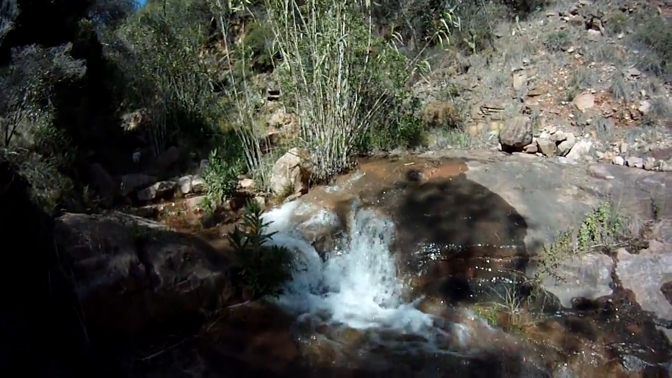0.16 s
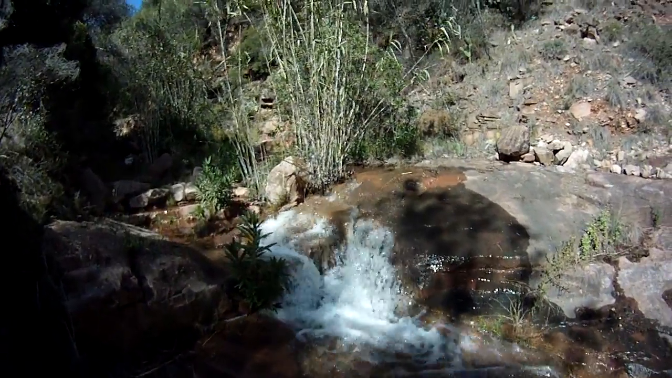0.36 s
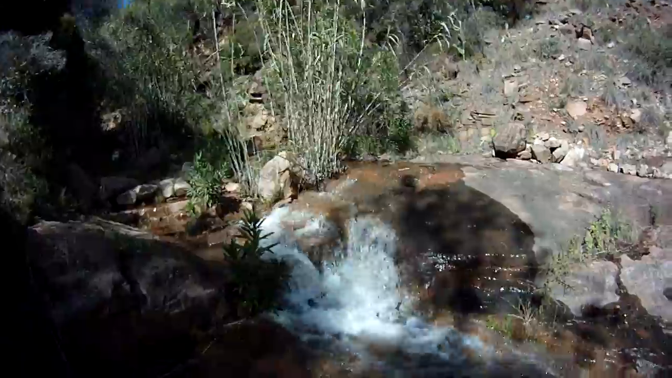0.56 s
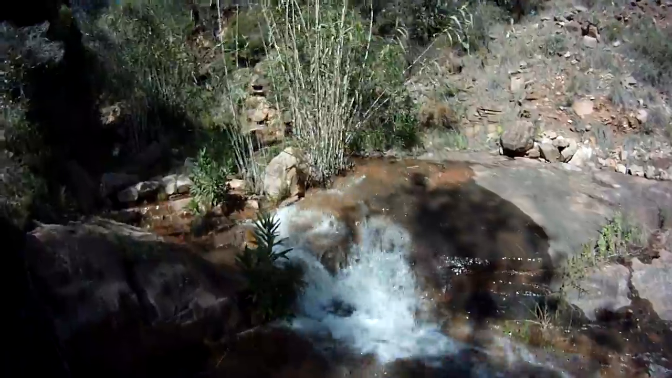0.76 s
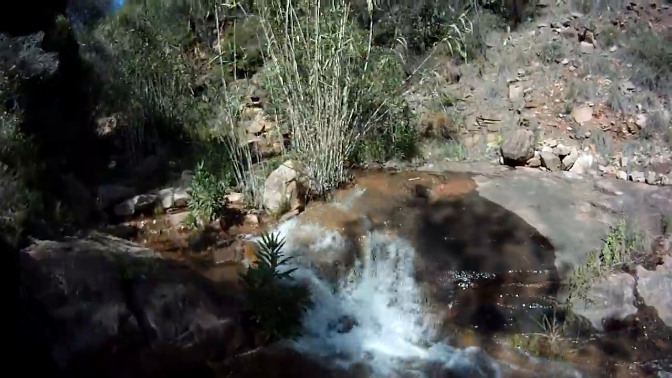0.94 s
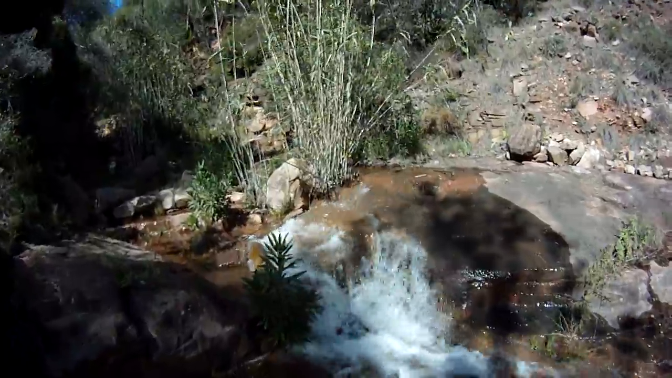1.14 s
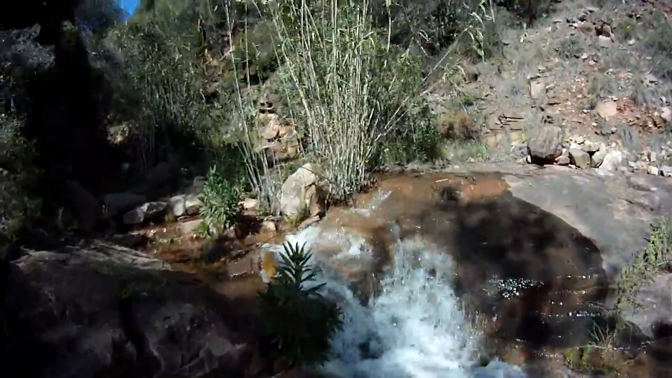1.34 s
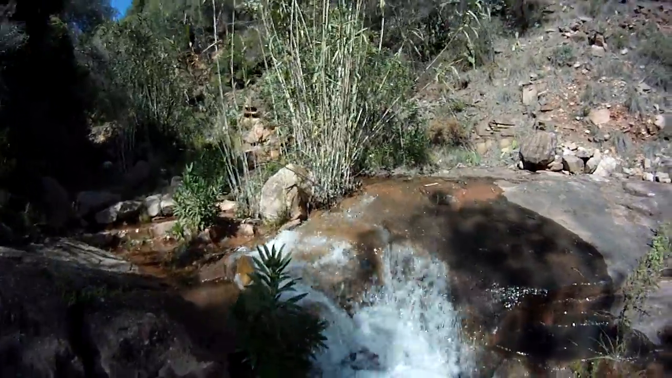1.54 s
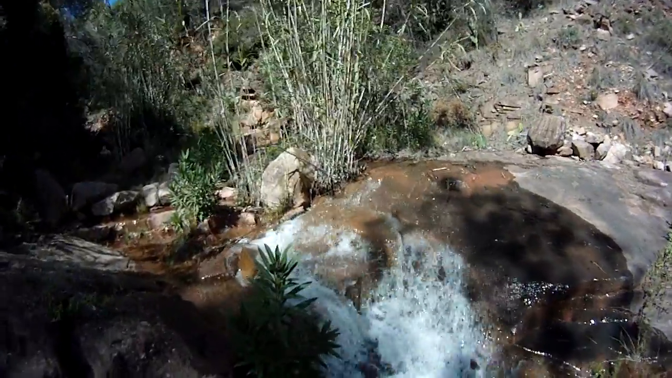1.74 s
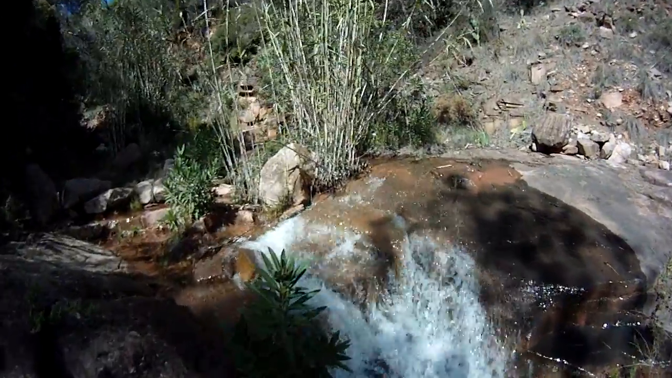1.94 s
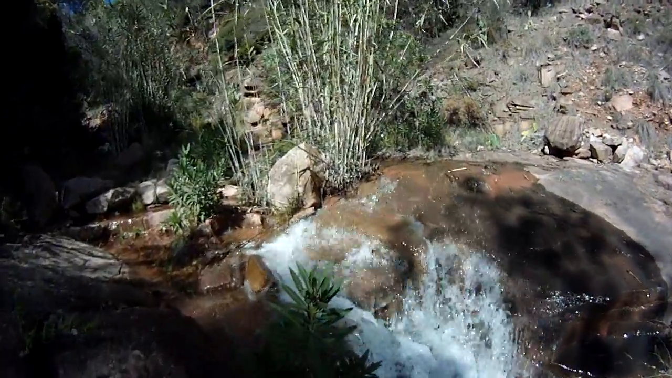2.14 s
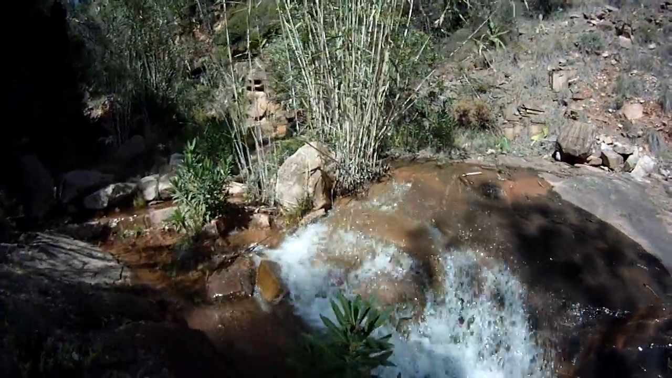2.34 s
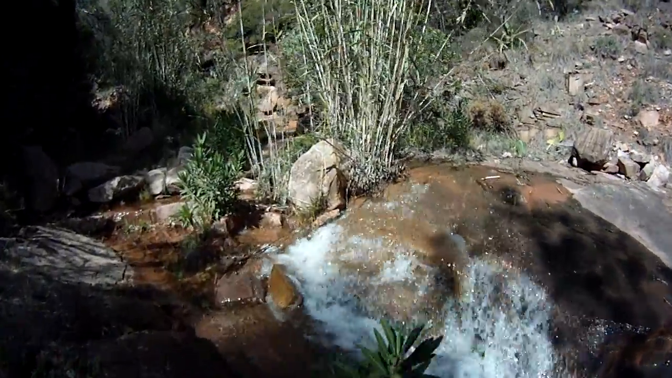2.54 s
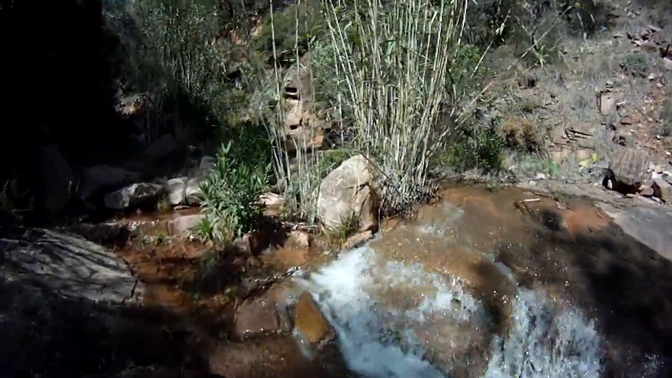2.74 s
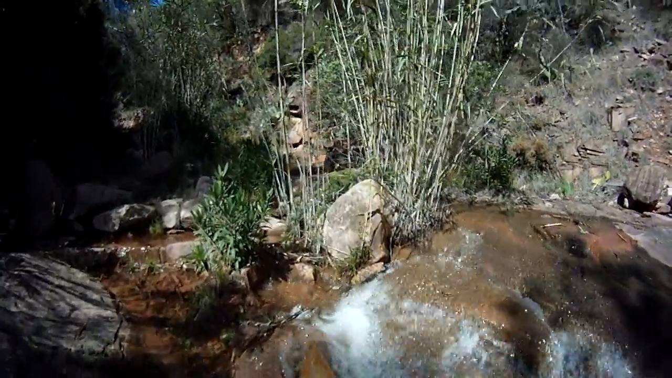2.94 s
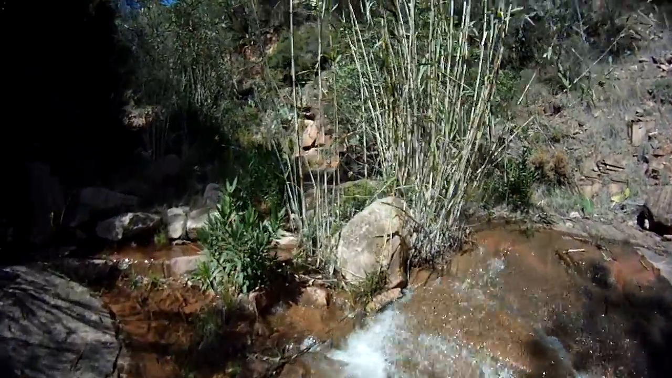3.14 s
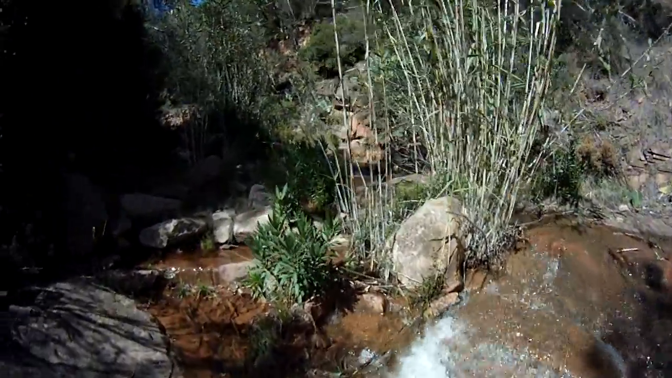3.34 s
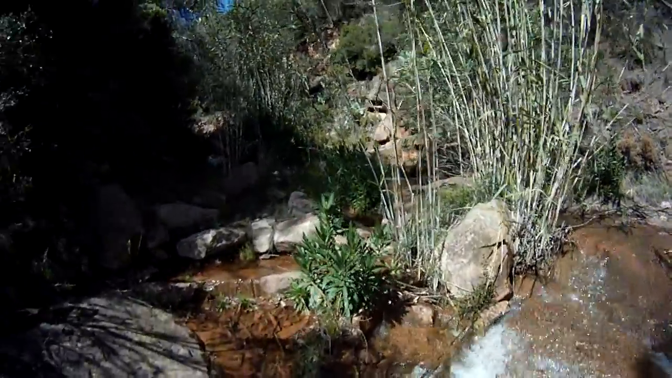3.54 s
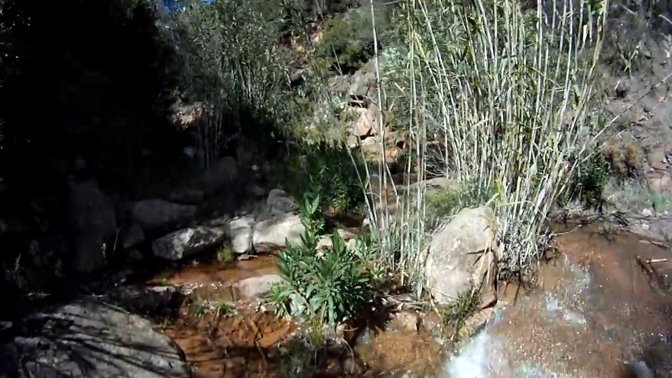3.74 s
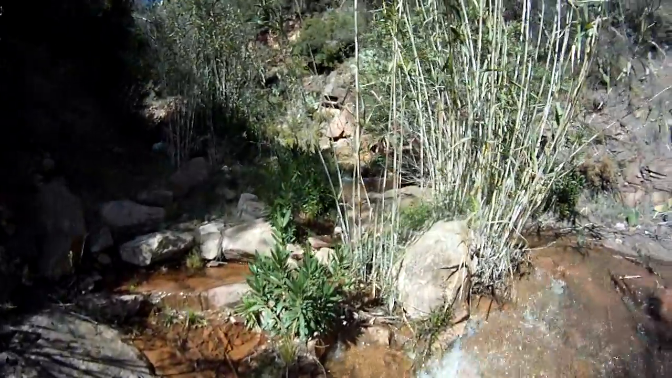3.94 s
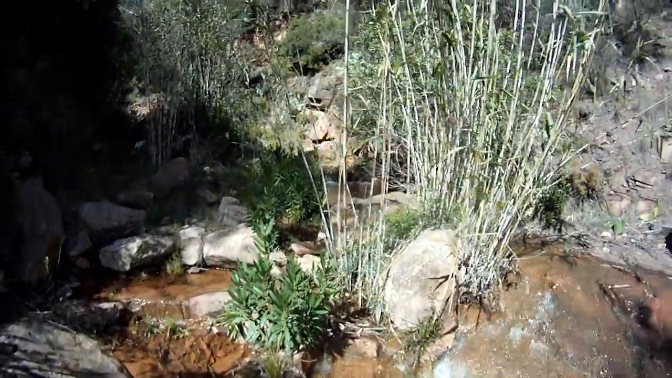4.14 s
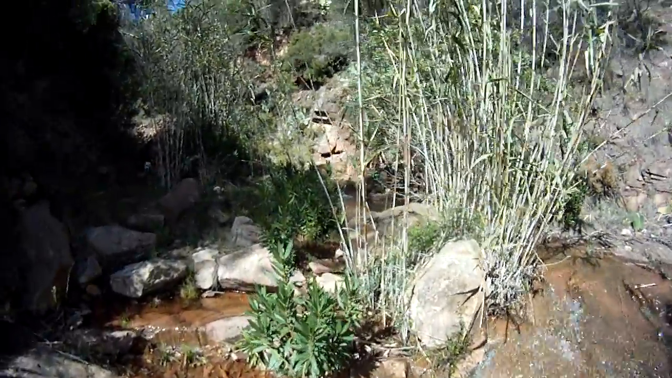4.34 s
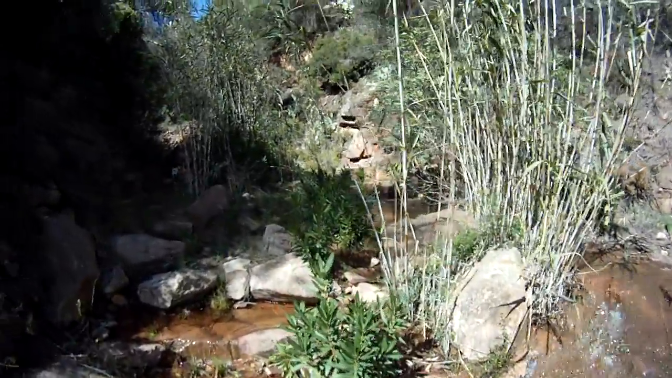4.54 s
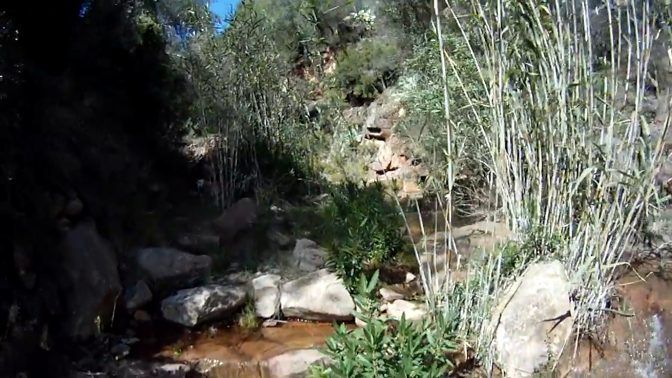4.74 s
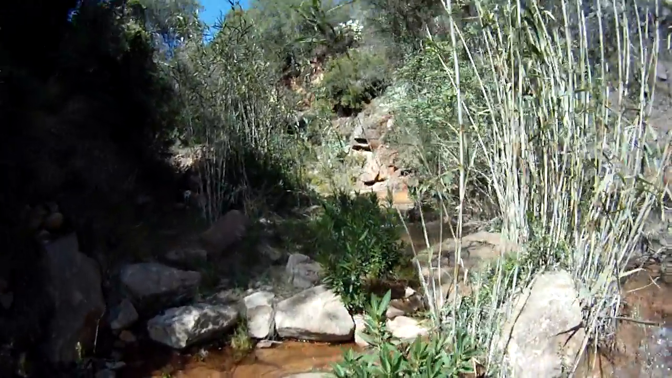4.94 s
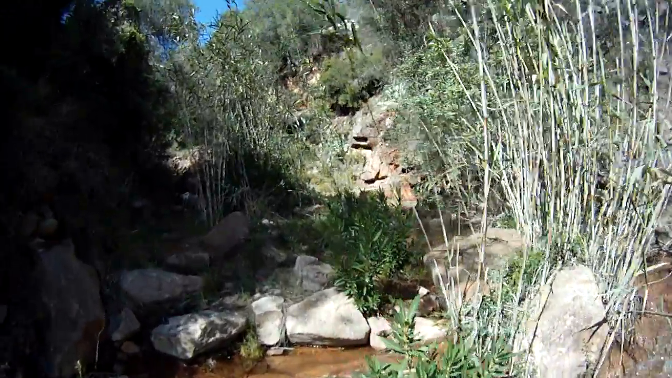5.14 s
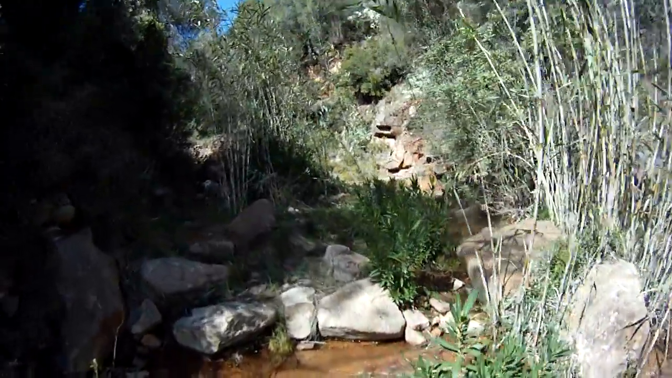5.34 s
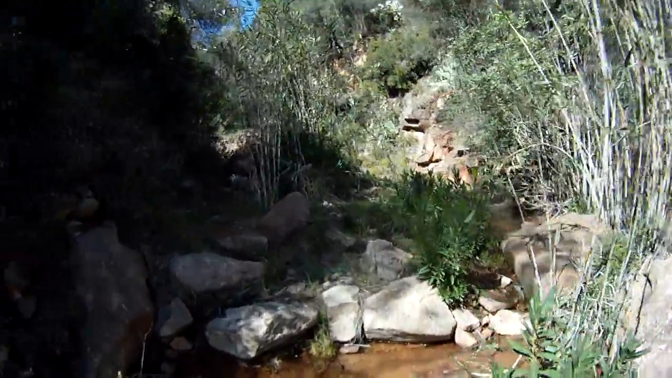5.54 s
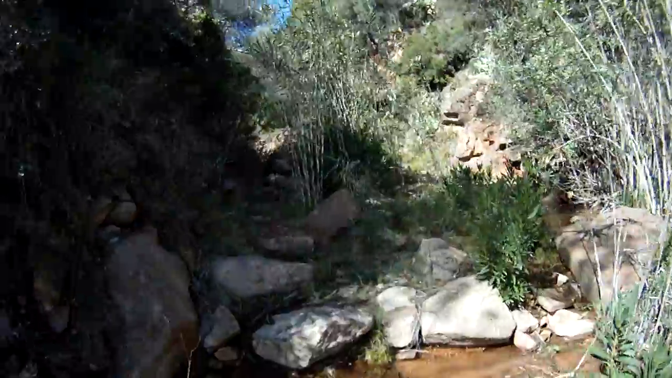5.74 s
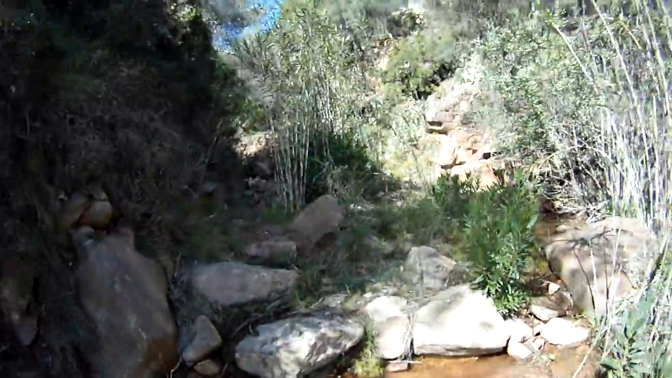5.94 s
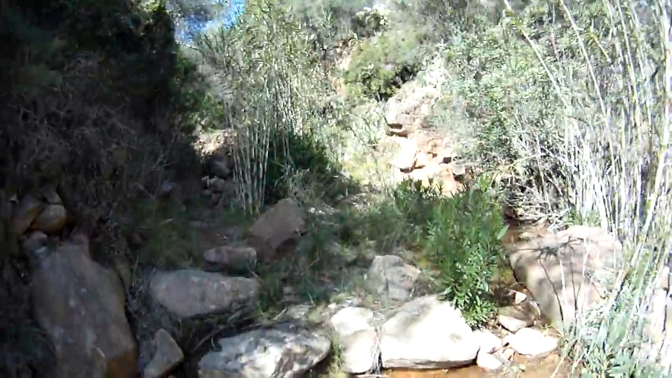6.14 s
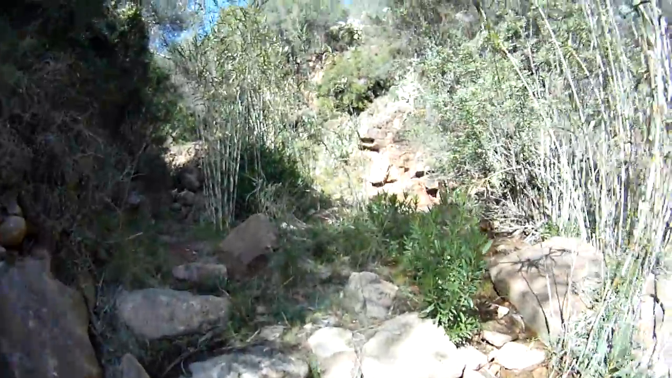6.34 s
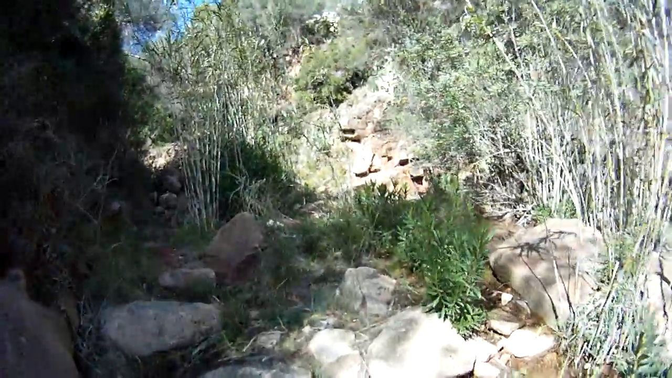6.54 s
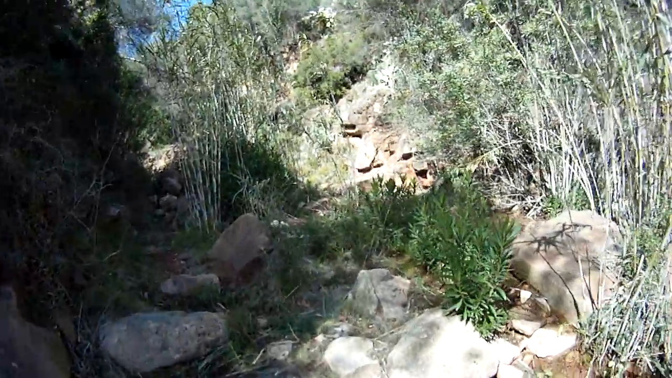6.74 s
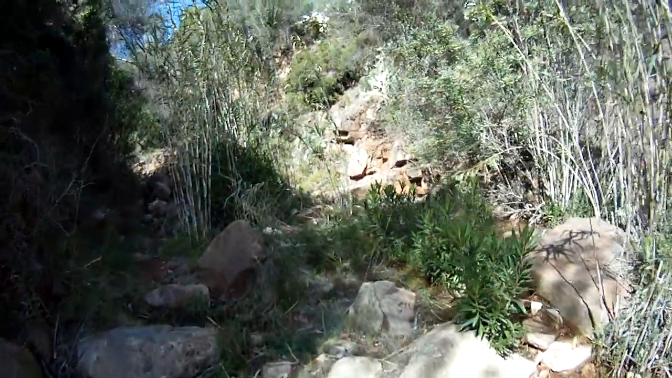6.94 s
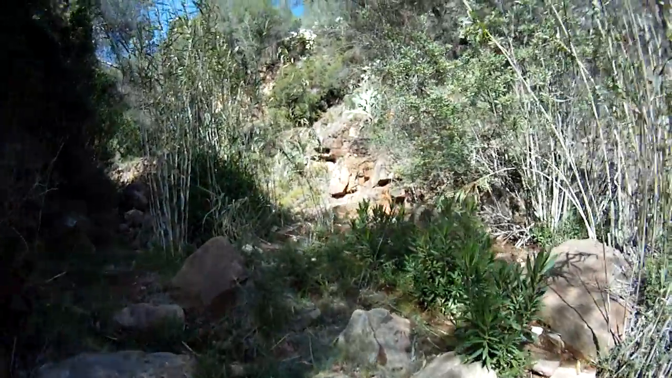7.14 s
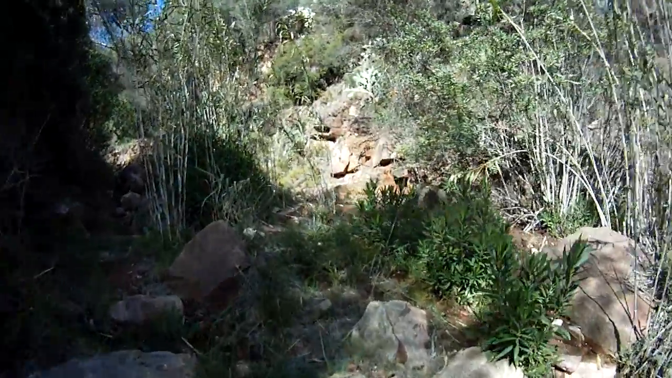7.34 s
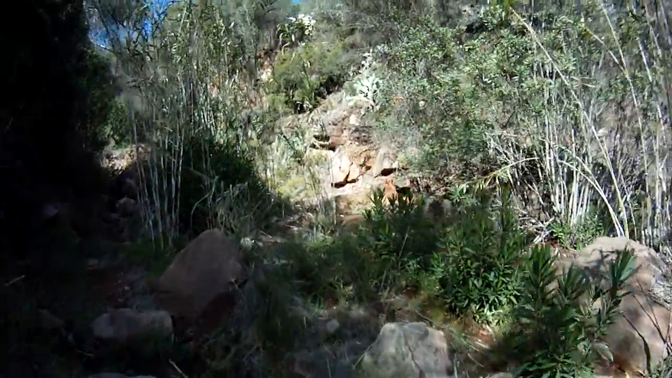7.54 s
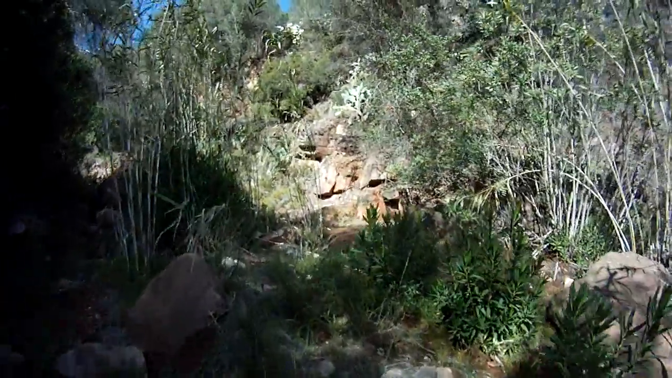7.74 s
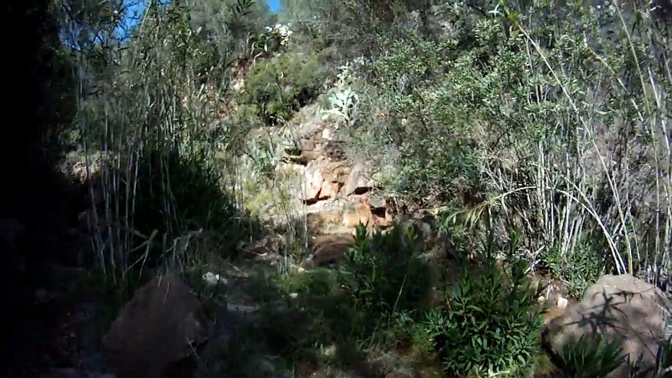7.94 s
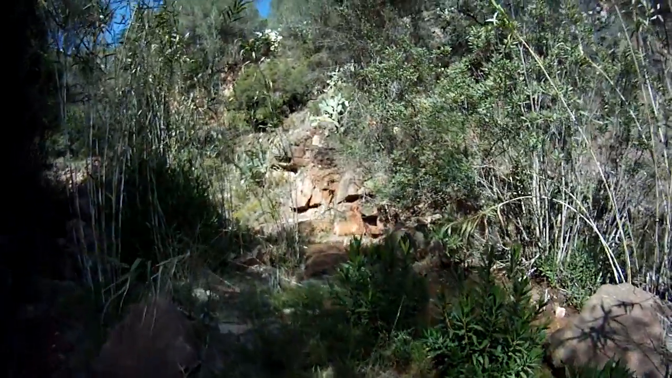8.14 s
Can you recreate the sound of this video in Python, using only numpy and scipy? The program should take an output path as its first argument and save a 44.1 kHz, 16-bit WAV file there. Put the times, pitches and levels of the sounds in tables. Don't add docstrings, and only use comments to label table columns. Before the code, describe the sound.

A small rocky cascade gurgles and booms close by, with hissing white water and fine drips, fading steadily as the listener walks away upstream.

```python
import sys
import numpy as np
from scipy import signal
from scipy.fft import rfft, irfft, next_fast_len
from scipy.io import wavfile
from scipy.ndimage import uniform_filter1d

SR = 44100
rng = np.random.default_rng(int(sys.argv[2]) if len(sys.argv) > 2 else 0)


def wav_out(sig):
    wavfile.write(sys.argv[1], SR, np.round(np.clip(np.atleast_2d(sig).T, -1, 1) * 32767).astype(np.int16))


def gain_from_db(level_db):
    decades = np.asarray(level_db, float) / 20
    return 10 ** decades


N = 365575

# (pitch [Hz], level [dB])
BOOM_COLOUR = [(12, -50), (20, -14), (43, -16), (72, 0.5), (105, 2.5), (135, 1), (165, -2), (200, -4.5),
               (260, -11), (440, -120)]
# (pitch [Hz], level [dB])
GURGLE_FRONT = [(94, -61), (160, -0.5), (275, 3), (317, -1.5), (371, -2), (605, -7), (1050, -23.5),
                (1360, -62), (2310, -120)]
GURGLE_BACK = [(94, -19), (160, -1), (211, -5.5), (312, -1.5), (349, -1.5), (377, 0.5), (521, -3.5),
               (904, -15), (1050, -29), (1360, -59), (2310, -120)]
# (time [s], pitch [Hz], level against the boom [dB])
ROCK_GAP = [(0, 100.6, -2), (.9, 105.1, -9), (1.5, 124.8, -6), (3.2, 127, 2.5), (4.6, 144, -2.5),
            (6, 150.2, -0.5), (6.8, 176.2, -3), (7.5, 152.8, -8.5), (8.29, 145.4, 3)]
# (pitch [Hz], level [dB])
SPRAY_FRONT = [(560, -3.5), (950, -5.5), (1140, -6.5), (1360, -3.5), (1530, -13), (2030, 1), (2440, -8.5),
               (2800, -11.5), (3640, -26), (6160, -120)]
SPRAY_BACK = [(560, -18), (950, -19), (994, -8), (1130, -18), (1210, -10.5), (1380, -4), (1480, -13.5),
              (1590, -6), (1820, -13.5), (2100, -9.5), (2270, -13), (2410, -11), (2800, -19.5), (3640, -34),
              (6160, -120)]
# (pitch [Hz], level [dB])
FIZZ_FRONT = [(1560, -37), (2650, -7.5), (3080, -3), (3200, -10), (3680, -4.5), (4070, -13), (4400, -10),
              (4720, -14), (5000, -8), (5300, -16), (5650, -10), (5990, -19), (6600, -60), (9000, -120)]
FIZZ_BACK = [(1560, -27), (2650, -7.5), (2770, -16), (3000, 0), (3240, -3.5), (3800, -5), (4260, -15),
             (4620, -12.5), (5240, -14.5), (5590, -14.5), (5990, -22), (7790, -57), (13200, -120)]
# (time [s], peak level [dB], pitch [Hz])
GULPS = [(0.144, -7.5, 205), (0.241, -13, 223), (0.69, -13.5, 269), (0.876, -2.5, 387), (1.334, -15, 179),
         (1.559, -10, 131), (2.219, -12, 124), (2.294, -20, 282), (2.316, -11, 283), (2.607, -11, 135),
         (2.825, -6.5, 258), (3.049, -15, 264), (4.298, -24, 307), (4.917, -9, 418), (6.228, -17, 161.4),
         (6.675, -18, 323), (7.357, -23, 490), (8.23, -13.5, 421)]
# (time [s], peak level [dB])
TICKS = [(0.0533, -37), (0.24, -36), (0.3516, -29), (1.0131, -31), (1.051, -32), (1.0959, -35),
         (1.257, -44), (2.831, -44), (3.4211, -40), (3.4795, -54), (3.659, -39), (4.115, -39),
         (4.9496, -39), (5.3726, -45), (6.1449, -44), (6.7366, -47), (7.1914, -51), (7.7732, -54)]
# (pitch [Hz], level [dB], ring length [cycles])
HOUSING_RINGS = [
    (2110, 2, 8.9),
    (2930, 5, 7.6),
    (3540, 2, 9),
    (5000, -11, 6.5),
]
# (time [s], distance [m])
WALK = [(0, 2.01), (1, 2.26), (2.5, 2.27), (3, 2.54), (3.8, 3.13), (4.6, 3.39), (5.2, 4.45), (5.7, 5.4),
        (6.5, 5.75), (7.1, 6.8), (7.9, 8.6), (8.29, 8.9)]
# (time [s], share [0 to 1])
BEHIND = [(0, 0), (2.8, 0.3), (4.5, 0.54), (6, 0.71), (8.29, 0.91)]


def plunge():
    gap_hz, gap_db = curves(ROCK_GAP)
    roar = coloured(patchy(0.73, tall=2, long=8), BOOM_COLOUR)
    boom = roar + gain_from_db(gap_db) * hum(gap_hz, width_hz=30.5)

    glugs = swarm(count=1800, low_hz=149.5, high_hz=902, cycles=5.5, rise=0.3, spread_db=1.5)
    churn = patchy(0.12, tall=3, long=6) + gain_from_db(-18) * glugs
    gurgle = turning(churn, GURGLE_FRONT, GURGLE_BACK) + upper_hollow()

    boom_level = gain_from_db(heard_db(near_db=-33.5, fall_db=5.04))
    gurgle_level = gain_from_db(heard_db(near_db=-25.5, fall_db=5.44))
    return boom_level * boom + gurgle_level * gurgle


def upper_hollow():
    behind = curves(BEHIND)[0]
    pitch_hz = 235 + (345 - 235) * behind
    level_db = -10.5 + (-11.5 + 10.5) * behind
    return gain_from_db(level_db) * hum(pitch_hz, width_hz=107)


def spray():
    beads = swarm(count=3000, low_hz=951, high_hz=2736, cycles=6.95, rise=0.23, spread_db=1.5)
    hiss = turning(patchy(0.17) + gain_from_db(-15.5) * beads, SPRAY_FRONT, SPRAY_BACK)

    drops = swarm(count=3000, low_hz=2460, high_hz=6020, cycles=13.6, rise=0.08, spread_db=2.5)
    fizz = turning(patchy(0.67, tall=9, long=3) + gain_from_db(-16) * drops, FIZZ_FRONT, FIZZ_BACK)

    hiss_level = gain_from_db(heard_db(near_db=-38.5, fall_db=6.57))
    fizz_level = gain_from_db(heard_db(near_db=-49.5, fall_db=6.5))
    surge_db = 0.47 * unit(uniform_filter1d(rng.standard_normal(N), round(0.054 * SR)))
    return gain_from_db(surge_db) * (hiss_level * hiss + fizz_level * fizz)


def gulps():
    start_s, peak_db, hz = np.transpose(GULPS)
    return bubbles(start_s + 0.00401, hz, gain_from_db(peak_db - 1.7), cycles=3.7, rise=0.045)


def drop_ticks():
    start_s, peak_db = np.transpose(TICKS)
    sound = np.zeros(N)
    for hz, ring_db, cycles in HOUSING_RINGS:
        pitches = np.full(len(start_s), hz)
        sound = sound + bubbles(start_s, pitches, gain_from_db(peak_db + ring_db), cycles, rise=0.02)
    return sound


def bubbles(start_s, hz, size, cycles, rise):
    turn = np.arange(int(3 * cycles * SR / hz.min())) / SR * hz[:, None]
    life = turn / cycles
    fade = (1 - np.exp(-life * 8)) ** 2 * np.exp(-2.3 * life)
    tone = np.sin(2 * np.pi * turn * (1 + rise * life / 2))
    at = np.round(start_s * SR).astype(int)[:, None] + np.arange(turn.shape[1])
    sound = size[:, None] * fade * tone * (life < 3) * (at < N)
    return np.bincount(at.ravel(), sound.ravel(), N)[:N]


def swarm(count, low_hz, high_hz, cycles, rise, spread_db):
    when, which_pitch, luck = rng.random((count, 3)).T
    hz = low_hz * (high_hz / low_hz) ** which_pitch
    size = gain_from_db(-spread_db * np.log(luck + 0.003)) * hz / low_hz
    return unit(bubbles(when * N / SR, hz, size, cycles, rise))


def hum(centre_hz, width_hz):
    slow = rng.standard_normal((2, N))
    for _ in range(2):
        slow = uniform_filter1d(slow, round(SR / width_hz), axis=1)
    carrier = np.exp(2j * np.pi * np.cumsum(centre_hz) / SR)
    return unit(np.real((slow[0] + 1j * slow[1]) * carrier))


def patchy(patchy_db, tall=6, long=10):
    z = signal.stft(rng.standard_normal(N + 512), nperseg=512)[2]
    patches = uniform_filter1d(rng.standard_normal(z.shape), tall, 0)
    patches = uniform_filter1d(patches, long, 1)
    return unit(signal.istft(z * gain_from_db(patchy_db * unit(patches)), nperseg=512)[1][:N])


def turning(source, front, back):
    behind = np.clip(curves(BEHIND)[0], 0, 1)
    return (1 - behind) * coloured(source, front) + behind * coloured(source, back)


def heard_db(near_db, fall_db):
    return near_db - fall_db * np.log2(curves(WALK)[0] / 2)


def coloured(x, spectrum):
    m = next_fast_len(N + 8192)
    f, db = np.transpose(spectrum)
    gain = gain_from_db(np.interp(np.log(np.fft.rfftfreq(m, 1 / SR) + 1), np.log(f + 1), db))
    return unit(irfft(rfft(x, m) * gain, m)[:N])


def curves(rows):
    s, *columns = np.transpose(rows)
    return [np.interp(np.arange(N) / SR, s, column) for column in columns]


def unit(x):
    return x / np.sqrt(np.mean(x ** 2) + 1e-20)


def scene():
    return (plunge() + spray() + gulps() + drop_ticks())[None]


def band_limit(x):
    return signal.sosfilt(signal.butter(12, 15380, fs=SR, output="sos"), x)


def record(dry):
    camera_hz, repeats = 12000, 4
    margin = SR // 30
    padded = np.pad(dry, ((0, 0), (margin, margin)), "reflect")
    slow = signal.resample_poly(padded, camera_hz, SR, axis=1)
    steps = np.repeat(slow, repeats, axis=1)
    held = signal.resample(steps, round(slow.shape[1] * SR / camera_hz), axis=1)
    kept = np.fft.rfftfreq(held.shape[1], 1 / SR) < 15290
    limited = irfft(rfft(held) * kept, held.shape[1])[:, margin:margin + N]
    return band_limit(limited)


dry = scene()
out = record(dry)
wav_out(out)
```